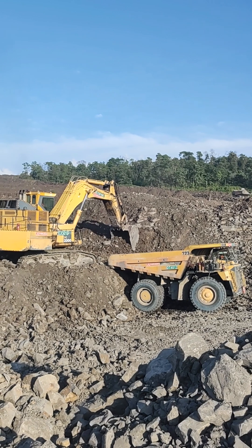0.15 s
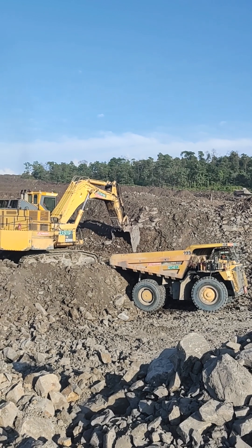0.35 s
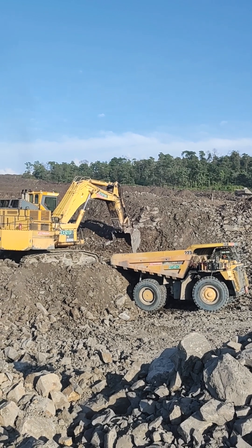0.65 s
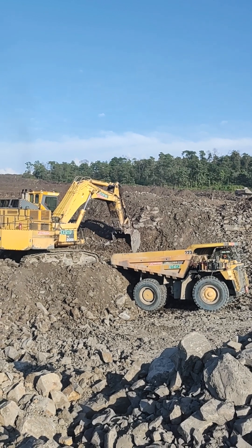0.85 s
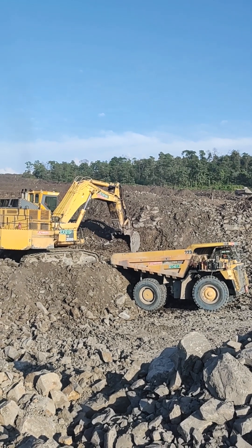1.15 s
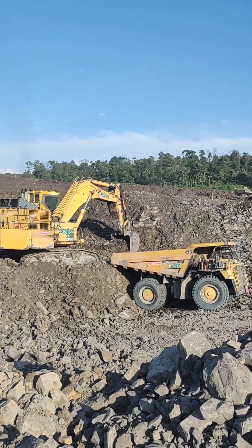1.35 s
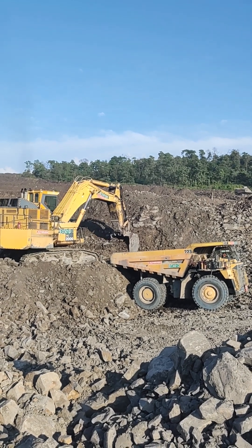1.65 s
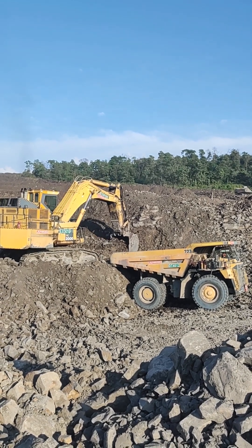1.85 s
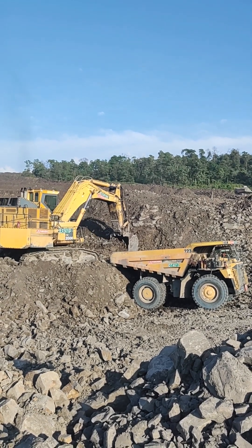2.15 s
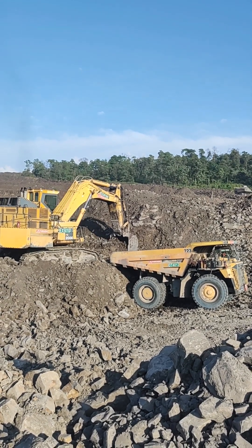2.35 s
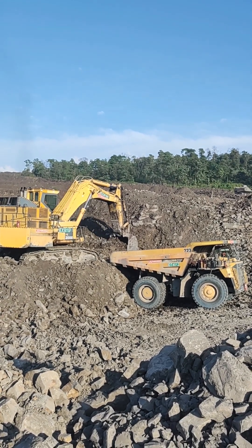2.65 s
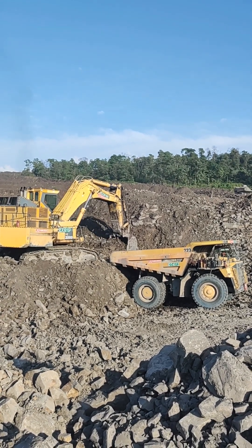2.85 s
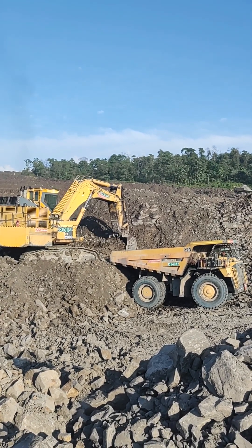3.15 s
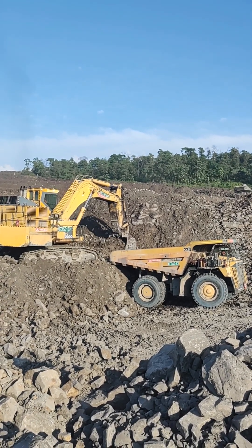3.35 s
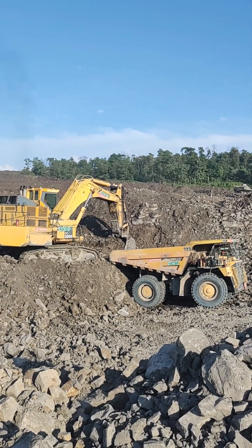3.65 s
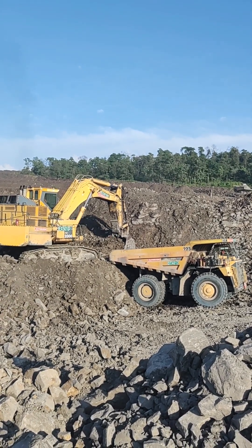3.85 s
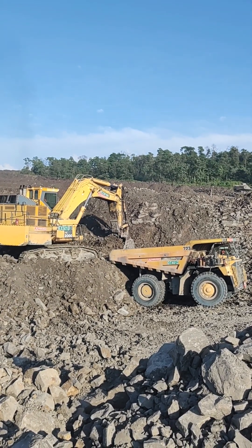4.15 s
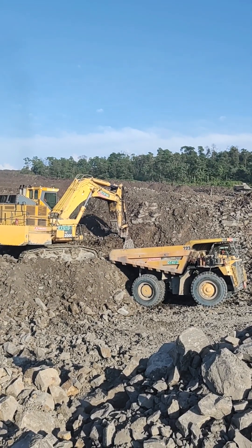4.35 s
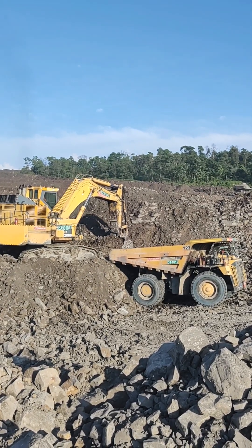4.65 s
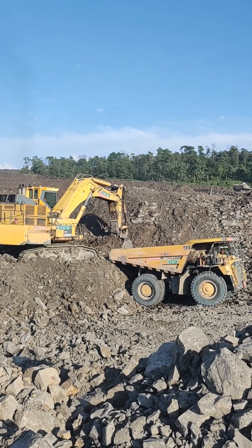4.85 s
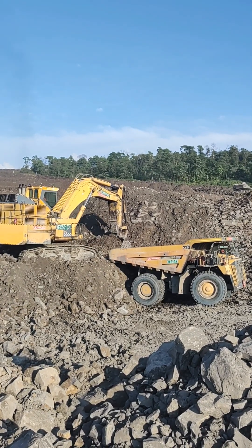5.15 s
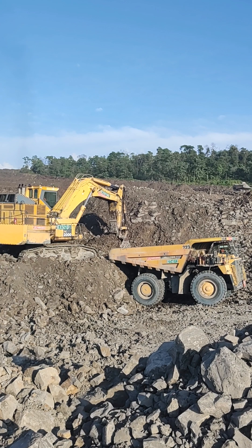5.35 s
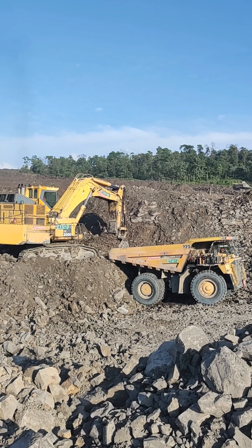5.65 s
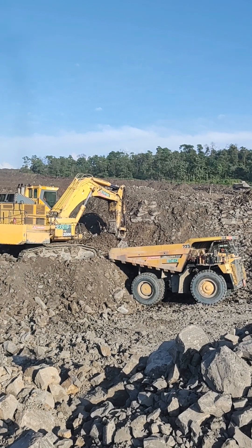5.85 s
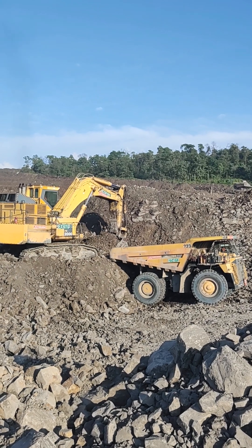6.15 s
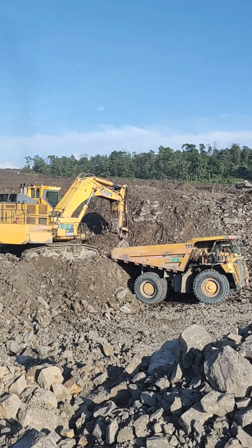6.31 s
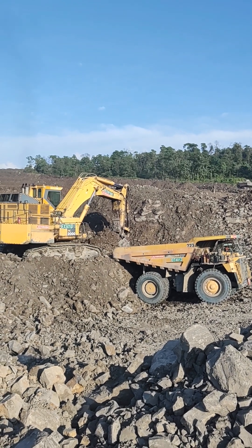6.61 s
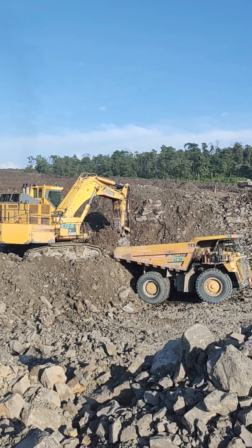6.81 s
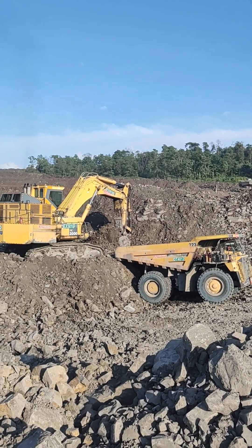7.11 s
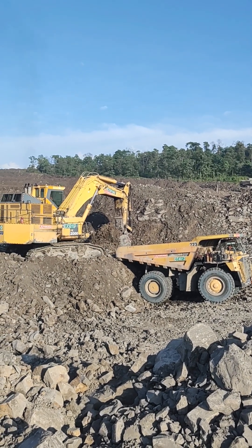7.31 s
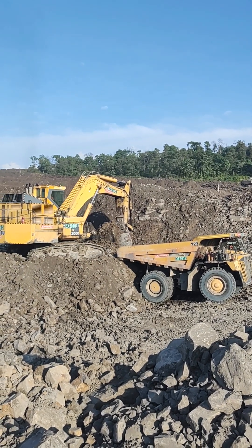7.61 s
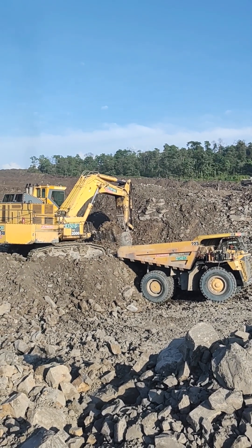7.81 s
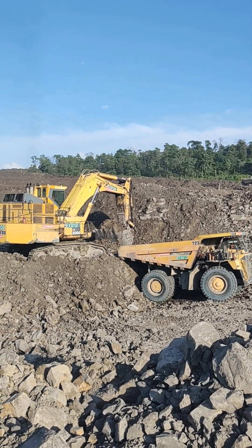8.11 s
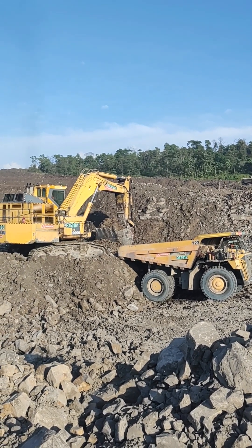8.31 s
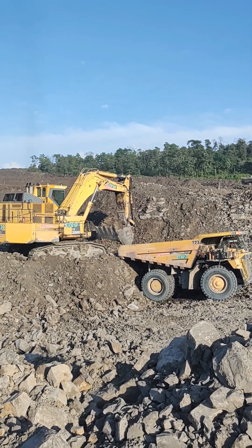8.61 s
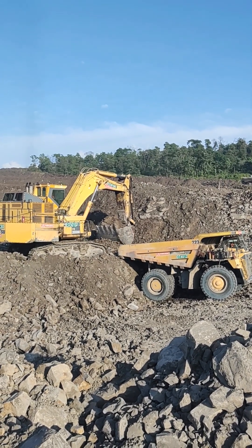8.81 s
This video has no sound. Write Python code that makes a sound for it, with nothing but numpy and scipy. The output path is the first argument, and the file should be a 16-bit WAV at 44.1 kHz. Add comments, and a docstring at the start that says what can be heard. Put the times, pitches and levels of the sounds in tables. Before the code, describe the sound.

Deep diesel engines throb and labour as an excavator digs, with hydraulic whine, a few rock knocks and one hollow bucket boom.

```python
"""A deep diesel drone comes first: a twin-engined mining excavator digs, a haul truck beside it.
Its two six-cylinder exhausts beat against each other and sag in pitch as the hydraulic pumps
take load and whine. The truck hums, exhaust gas rumbles, cooling fans roar and valves clatter.
A rock cracks against steel, and later sliding earth makes the bucket boom."""
import sys
import numpy as np
from scipy import signal
from scipy.fft import rfft, irfft, next_fast_len
from scipy.io import wavfile

SR = 44100
rng = np.random.default_rng(int(sys.argv[2]) if len(sys.argv) > 2 else 0)


def persist_wave(psi):
    """Save psi, clipped to +-1, as 16-bit WAV."""
    counts = np.round(np.clip(psi, -1, 1) * 32767).astype(np.int16)
    wavfile.write(sys.argv[1], SR, np.atleast_2d(counts).T)


N = 395577
TIME = np.arange(N) / SR

# the excavator's loud engine, slowed by the pumps' load: t/s, speed/rps (revolutions per second)
MAIN_RPS = [(0.0, 30.39), (0.15, 29.89), (0.28, 28.11), (0.32, 27.72), (2.21, 26.32), (2.75, 27.51),
            (3.01, 27.52), (3.56, 26.81), (4.11, 27.5), (5.72, 27.57), (6.18, 30.81), (6.54, 30.65),
            (6.94, 28.38), (7.16, 28.23), (7.5, 26.63), (8.48, 27.32), (8.81, 29.87), (8.97, 30.2)]
# its second, farther engine: t/s, speed/rps
TWIN_RPS = [(0, 30.2), (1, 28.5), (2.6, 26.7), (4.7, 26.7), (6, 27), (6.9, 28.8), (7.7, 27.6), (8.97, 27)]
# tones of a six-cylinder exhaust: multiple of engine speed, relative level/dB
EXHAUST_TONES = [(3, -29), (4.5, -35.5), (5, -29), (6, 0), (9, -34.5), (12, -36.5)]
# hard pulls of the dig, when both exhausts swell: t/s, hold/s, boost/dB
HARD_PULLS = [(.45, 0.88, 5.5), (2.3, 1.06, 2), (7.2, .6, 1)]
# tones of the pumps: multiple of pump speed, relative level/dB
PUMP_TONES = [(10, -8), (12, 1.5), (15, -14.5), (18, -18), (24, -21)]
# the pumps push a ram that moves the arm: t/s, hold/s, level/dB
RAM_STROKES = [(1.28, 1.14, -40), (2.65, 0.19, -43), (3.33, .3, -37.5), (4.0, .75, -44),
               (5.153, .48, -43.5), (6.25, .7, -43), (7.349, .5, -41.5)]
# the truck's eight-cylinder engine: t/s, speed/rps
TRUCK_RPS = [(0.0, 30.32), (1.08, 27.22), (2.23, 26.47), (3.37, 27.28), (3.91, 26.9), (4.82, 27.41),
             (5.92, 27.28), (6.8, 29.17), (8.03, 26.68), (8.97, 27.35)]
# the hum of its exhaust: multiple of engine speed, relative level/dB
HUM_TONES = [(4, -4), (8, 0)]
# its higher rasp: multiple of engine speed, relative level/dB
RASP_TONES = [(9, -4), (10.5, -2.5), (12, 1), (14, -5), (15, -9), (16, -5), (17, -6.5), (20, 0),
              (24, -12.5)]
# rock hits steel: t/s, level/dB, build-up/s, hardness from 0 to 1
ROCK_HITS = [(1.866, -37, 0.0045, 0.04), (2.035, -32.5, .0005, 0.4), (2.04, -29, 0.0015, 0.1),
             (2.048, -26.5, 0.0036, 0), (2.081, -38.5, 0.0023, 0.4), (2.175, -37, .006, 0.2)]
# the noise of cracking stone: f/Hz, relative level/dB
CRACK_SPECTRUM = [(300, 3.5), (950, 7.5), (1800, 2), (2700, -2), (3700, -8), (5200, -19.5), (7800, -34)]
# the steel's ringing tones: f/Hz, relative level/dB, time to fade by 60 dB/s
STEEL_TONES = [(920, -18, .16), (1260, -14, .14), (1540, -17, .12), (1956, -14, 0.096), (2330, -12, .14),
               (3490, -18, 0.054)]
# the bucket's hollow boom: t/s, f/Hz, level/dB, time to fade by 60 dB/s
BUCKET_BOOMS = [(4.94, 388.7, -22, 0.35)]
# exhaust gas swirling in the silencers: f/Hz, relative level/dB
RUMBLE_SPECTRUM = [(25, -38.5), (50, -28.5), (69, -20.5), (84, 0), (118, -6.5), (145, -0.5), (205, -0.5),
                   (238, -6.5), (315, -5), (355, -10), (392, -4.5), (440, -12.5), (580, -7), (640, -19)]
# fan noise, with peaks and dips from the ground's reflection: f/Hz, relative level/dB
FAN_SPECTRUM = [(400, -12), (660, 1), (740, -2), (860, -2), (1000, 0), (1130, -3), (1270, -2.5),
                (1680, -8.5), (2050, -19.5), (4000, -39.5)]
# valves and fuel injectors: f/Hz, relative level/dB
CLATTER_SPECTRUM = [(1000, -9), (1900, -1), (2600, 0), (3150, -5.5), (3450, -10), (3700, -9), (4200, -13.5),
                    (4700, -14.5), (5300, -18.5), (6300, -24), (7400, -24), (7800, -32.5)]
# steady machine whines: f/Hz, level/dB
STEADY_WHINES = [(1045, -53.5), (308.2, -53)]

WORKING_RPS = 27.4  # usual engine speed under load
GOVERNOR_RPS, GOVERNOR_KNEE_RPS = 27.9, .35  # the fuel is cut back around this speed, this gradually


def excavator_exhausts(main_speed, twin_speed, main_db=-24, twin_db=-36, fuel_cut_db=4):
    """Two exhausts at nearly the same speed beat, and grow louder under load."""
    pull_db = sum(db * swell(start, hold, rise=.6, fall=.49) for start, hold, db in HARD_PULLS)
    fuel_cut = .5 + .5 * np.tanh((main_speed - GOVERNOR_RPS) / GOVERNOR_KNEE_RPS)
    main_gain = from_db(main_db + pull_db - fuel_cut_db * fuel_cut)
    main = main_gain * tones(main_speed, EXHAUST_TONES, waver_db=.02, rough=.05)
    twin = from_db(twin_db + pull_db) * tones(twin_speed, EXHAUST_TONES, waver_db=1, rough=.072)
    # the engine block throbs as the cylinders fire, three times a turn, whatever the load
    block = tones(main_speed, [(3, -42)], waver_db=1.2, rough=.1)
    return main + twin + block


def hydraulic_pumps(engine_speed, gearing=1.425, idle_db=-50):
    """Piston pumps geared to the engine: faint when idle, whining through each stroke."""
    strokes = sum(from_db(db) * swell(start, hold, rise=.12, fall=.12) for start, hold, db in RAM_STROKES)
    whine = tones(gearing * engine_speed, PUMP_TONES, waver_db=.1, rough=.072)
    return np.maximum(strokes, from_db(idle_db)) * whine


def haul_truck(speed, hum_db=-35.5, rasp_db=-52, hum_db_per_rps=2.15):
    """The exhaust hums louder as load slows the engine, and thins to a rasp as it speeds up."""
    sag = WORKING_RPS - speed
    hum = from_db(hum_db + hum_db_per_rps * sag) * tones(speed, HUM_TONES, waver_db=.5, rough=.054)
    rasp_gain = from_db(rasp_db - 8 * np.tanh(.88 * sag))
    return hum + rasp_gain * tones(speed, RASP_TONES, waver_db=2, rough=.067)


def rock_knocks(crack_fade_s=.064, ring_db=-4, echo_s=.0031, echo_db=-6):
    """Each hit crunches briefly and sets the steel ringing; a hard one adds a bright snap."""
    crunch = noise(CRACK_SPECTRUM)
    snap = noise([(3500, 3.5), (7500, -13.5)])
    out = np.zeros(N)
    for start, db, build_up, hardness in ROCK_HITS:
        age = TIME - start
        sounding = (age > 0) & (age < .5)
        age = age[sounding]
        ring = sum(from_db(level - 60 * age / fade_s) * np.sin(2 * np.pi * (hz * age + rng.random()))
                   for hz, level, fade_s in STEEL_TONES)
        onset = 1 - np.exp(-age / build_up)
        fade = from_db(-60 * age / crack_fade_s)
        stone = crunch[sounding] * fade + hardness * snap[sounding] * fade ** 2
        out[sounding] += from_db(db) * onset * (stone + from_db(ring_db) * ring)
    # an echo off the ground arrives just after and hollows the sound
    return out + from_db(echo_db) * np.interp(TIME - echo_s, TIME, out)


def bucket_boom(build_up_s=.028):
    """Sliding earth sets the bucket's steel plate ringing on one low note."""
    out = np.zeros(N)
    for start, hz, db, fade_s in BUCKET_BOOMS:
        age = np.maximum(TIME - start, 0)
        onset = 1 - np.exp(-age / build_up_s)
        out += from_db(db - 60 * age / fade_s) * onset * np.sin(2 * np.pi * hz * age)
    return out


def machine_roar(speed):
    """Swirling gas, fans and valves grow louder with engine speed, over faint steady whines."""
    revving = speed - WORKING_RPS
    # each level in dB: its value at working speed + growth with speed + a random flutter
    rumble = from_db(-31.6 + .54 * revving + .52 * drift(6)) * noise(RUMBLE_SPECTRUM)
    fans = from_db(-39.5 + .32 * revving + .62 * drift(16)) * noise(FAN_SPECTRUM)
    clatter = from_db(-49 + .2 * revving + .28 * drift(12)) * noise(CLATTER_SPECTRUM)
    whines = tones(np.ones(N), STEADY_WHINES, waver_db=2, rough=.15)  # at 1 rps, multiples are Hz
    return rumble + fans + clatter + whines


def tones(speed, rows, waver_db, rough):
    """Tones that follow a turning shaft; each wavers in the moving air and varies from turn to turn."""
    shaft_angle = 2 * np.pi * np.cumsum(speed) / SR
    out = np.zeros(N)
    for multiple, db in rows:
        phase = multiple * shaft_angle + rng.uniform(0, 2 * np.pi) + rough * drift(22)
        gain = from_db(db + waver_db * drift(1.6)) * (1 + rough * drift(25))
        out += gain * np.sin(phase)
    return np.sqrt(2) * out


def noise(spectrum):
    """Noise of strength 1, shaped by a spectrum table and fading beyond the table's ends."""
    hz, db = np.transpose(spectrum)
    size = next_fast_len(N)
    f = np.maximum(np.fft.rfftfreq(size, 1 / SR), 1)
    edges = np.minimum(f / hz[0], 1) ** 2 * np.minimum(hz[-1] / f, 1) ** 4
    gain = from_db(np.interp(np.log(f), np.log(hz), db)) * edges
    white = rfft(rng.standard_normal(size))
    return rms_one(irfft(white * gain, size)[:N])


def drift(rate_hz):
    """A smooth random wobble of typical size 1, changing about rate_hz times a second."""
    step, warm_up = 100, 1000  # samples per point, points thrown away
    pole = np.exp(-2 * np.pi * rate_hz * step / SR)
    white = rng.standard_normal(N // step + warm_up + 2)
    smooth = signal.lfilter([1], [1, -2 * pole, pole * pole], white)[warm_up:]
    return np.interp(np.arange(N) / step, np.arange(len(smooth)), rms_one(smooth))


def swell(start, hold, rise, fall):
    """Rise from 0 to 1, hold, then fall back; all times are in seconds."""
    return np.interp(TIME, start + np.cumsum([0, rise, hold, fall]), [0, 1, 1, 0])


def from_db(db):
    """Turn decibels into a number to multiply by."""
    return 10 ** (np.asarray(db) / 20)


def rms_one(x):
    """Scale a signal so that its average strength (rms) is 1."""
    return x / np.sqrt(np.mean(x ** 2) + 1e-20)


def scene():
    """All the machines, heard in one channel from the rim of an open pit."""
    main_speed, twin_speed, truck_speed = (
        np.interp(TIME, *np.transpose(curve)) for curve in (MAIN_RPS, TWIN_RPS, TRUCK_RPS))
    excavator = excavator_exhausts(main_speed, twin_speed) + hydraulic_pumps(main_speed)
    truck = haul_truck(truck_speed)
    roar = machine_roar((main_speed + truck_speed) / 2)
    return (excavator + truck + roar + rock_knocks() + bucket_boom())[None]


def record(dry, cutoff_hz=7800):
    """A steep filter removes the highest treble."""
    return signal.sosfilt(signal.ellip(10, .2, 80, cutoff_hz, fs=SR, output="sos"), dry)


dry = scene()
out = record(dry)
persist_wave(out)
```